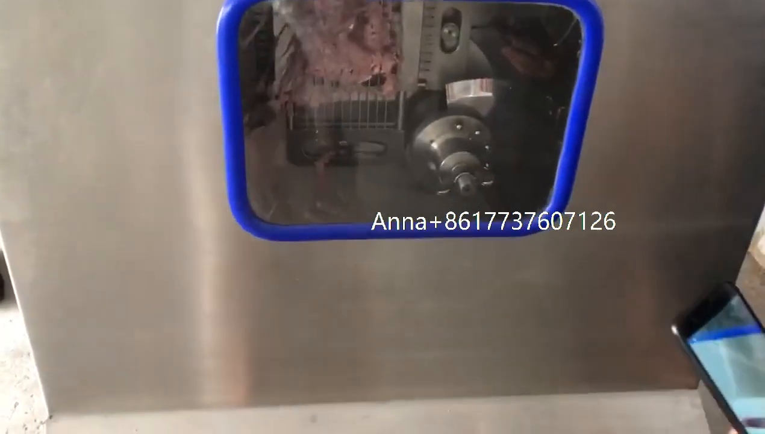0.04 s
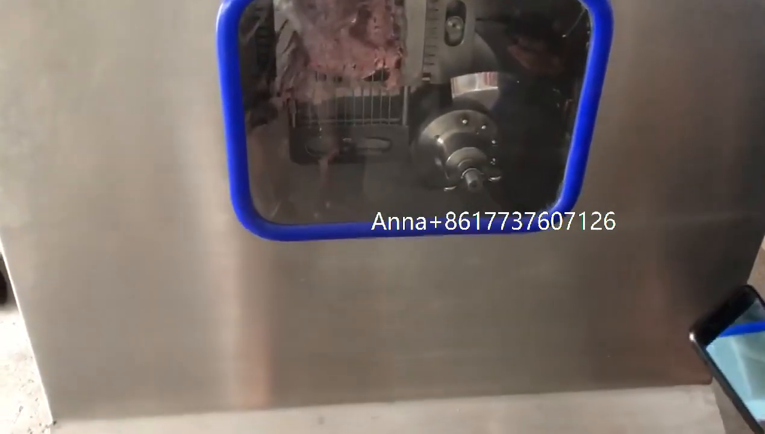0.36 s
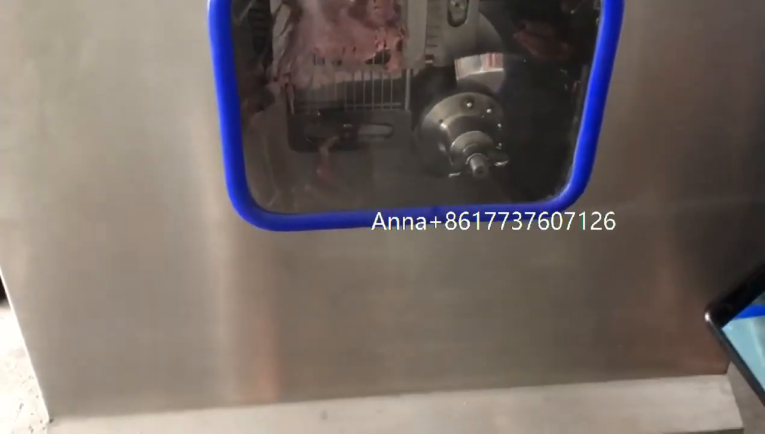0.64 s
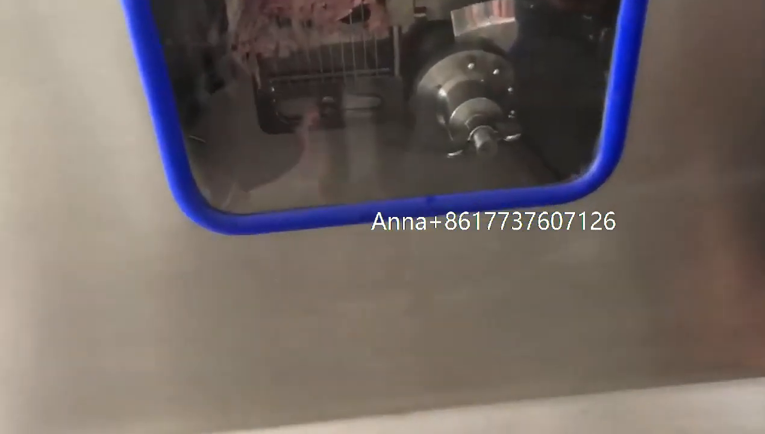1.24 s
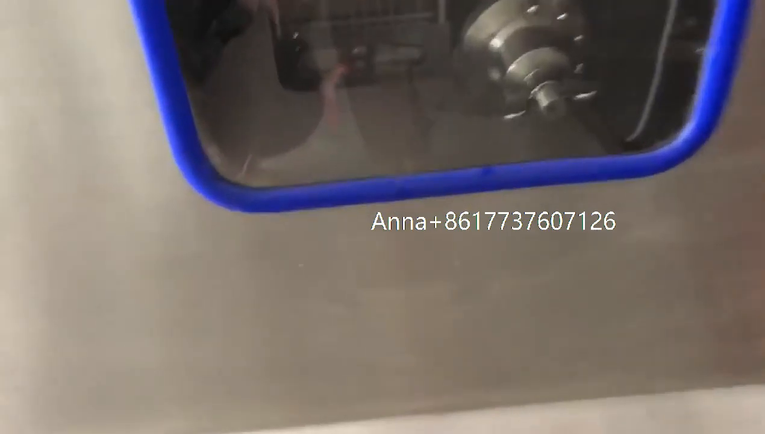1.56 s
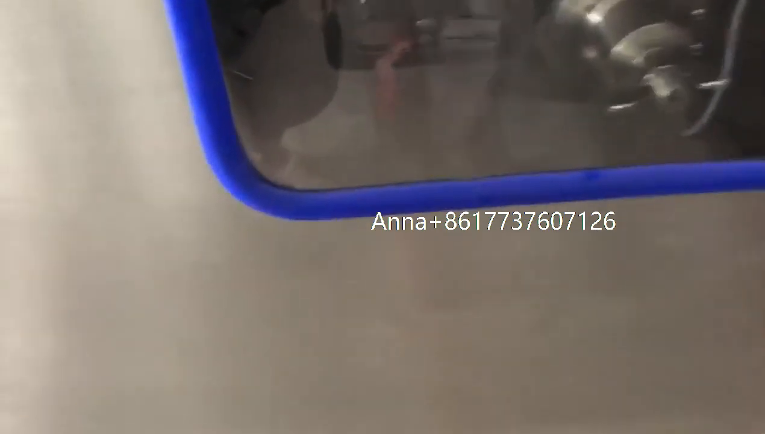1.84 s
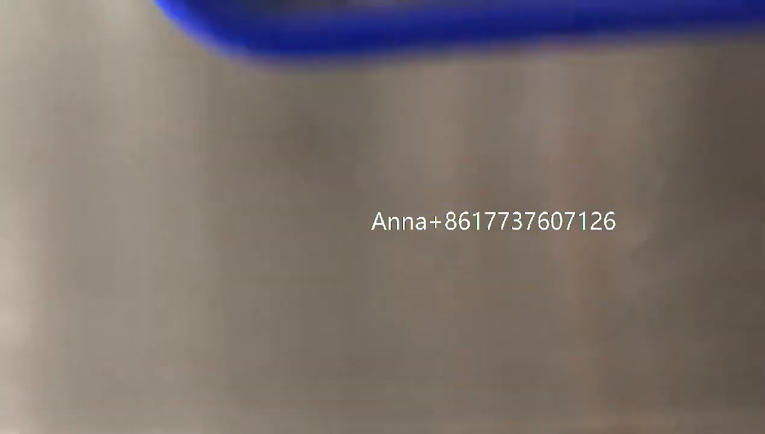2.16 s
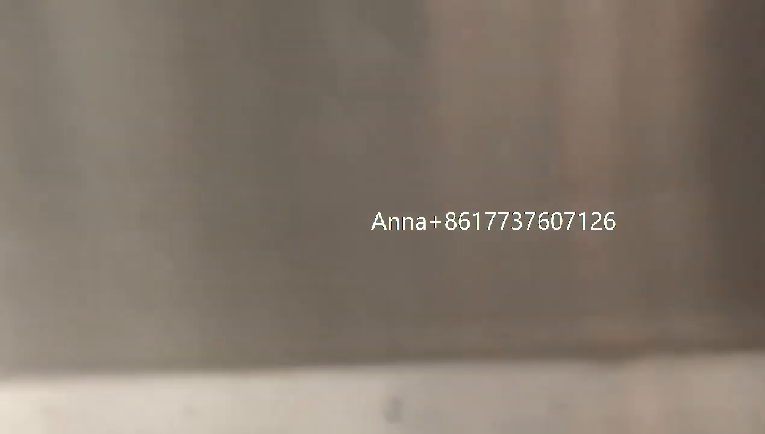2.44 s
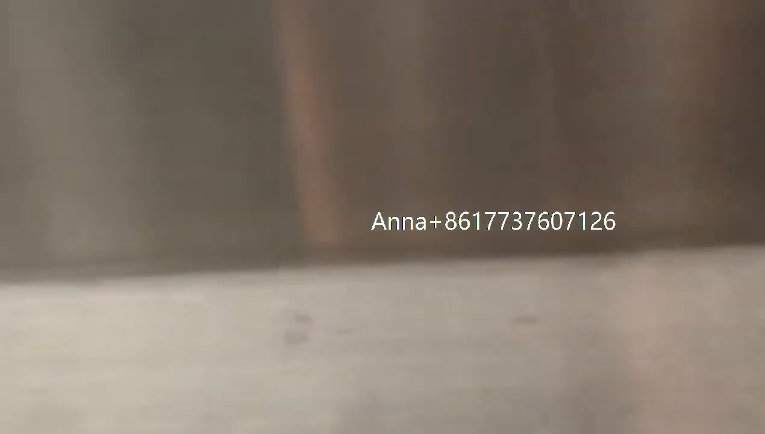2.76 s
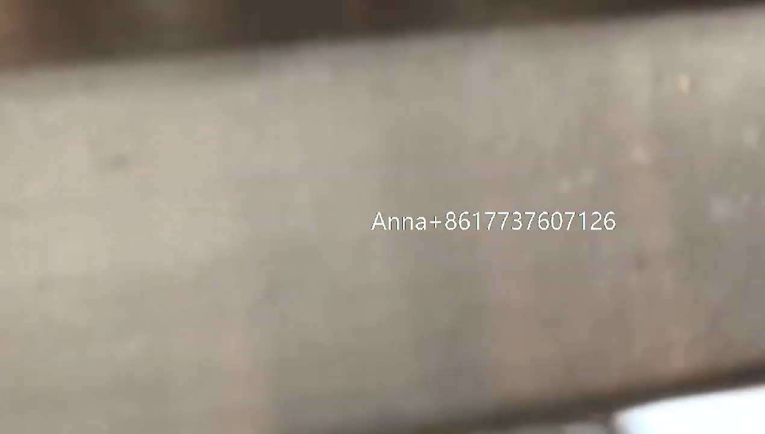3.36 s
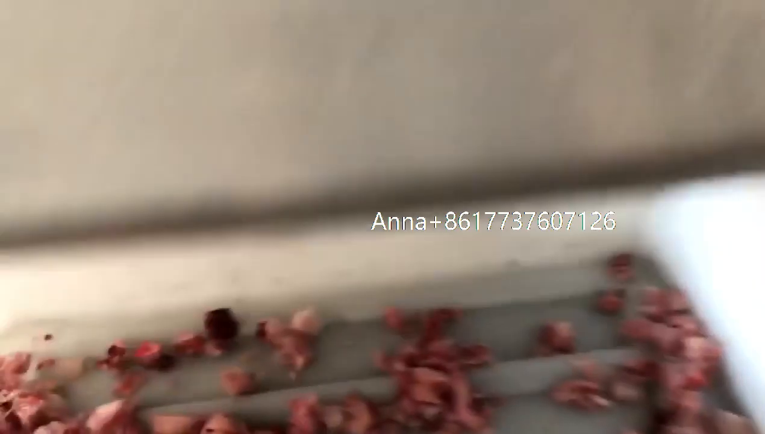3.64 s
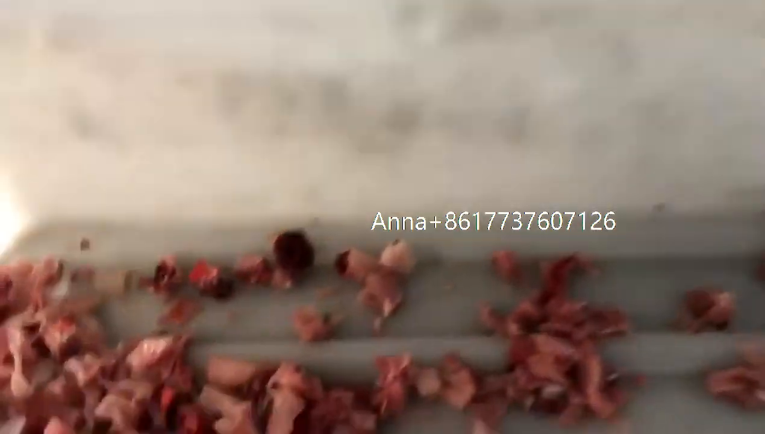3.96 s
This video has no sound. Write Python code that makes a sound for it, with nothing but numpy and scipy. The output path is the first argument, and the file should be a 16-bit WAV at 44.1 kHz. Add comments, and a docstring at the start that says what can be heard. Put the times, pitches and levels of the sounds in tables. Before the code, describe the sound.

Steady motor hum and gear whine from a dicer, ending with wet chunks slapping onto metal.

```python
"""A steady machine hum with a gear whine: a meat dicer running in its steel cabinet, heard from a
microphone that moves along it towards the outlet. The gear teeth hum and whine, the shaft rubs once
a turn, the motor buzzes; ticks, thuds, a hollow knock and two tiny squeaks come from inside.
Near the end wet cubes of meat patter, slap and pop onto a ringing steel tray."""
import sys
import numpy as np
from scipy import signal
from scipy.fft import rfft, irfft
from scipy.io import wavfile
from scipy.ndimage import map_coordinates

SR = 44100
rng = np.random.default_rng(int(sys.argv[2]) if len(sys.argv) > 2 else 0)


def waveform_to_disk(signal):
    """Save audio, clipped to [-1, 1], as 16-bit WAV at the path in sys.argv[1]."""
    frames = np.transpose(np.atleast_2d(signal))
    scaled = np.clip(frames, -1, 1) * 32767
    samples = np.round(scaled).astype(np.int16)
    wavfile.write(sys.argv[1], SR, samples)


N = 176400
T = np.arange(N) / SR
SHAFT_HZ = 24.658

# spectrum of loose cubes landing: f/Hz, density/dB
CUBE_SPECTRUM = [(59, -28), (100, -1), (161, -18), (305, 1), (452, -6.5), (877, -1), (1030, -7),
                 (1560, -0.5), (2270, -8.5), (4680, -14), (9260, -19), (11200, -21.5), (14000, -27)]


def undb(db):
    """Decibels to gain."""
    return 10 ** (np.asarray(db) / 20)


def unit(x):
    """Scale to rms 1."""
    return x / np.sqrt(np.mean(x ** 2) + 1e-20)


def fader(table, column=1):
    """Gain over time from one dB column of a table."""
    rows = np.array(table)
    return undb(np.interp(T, rows[:, 0], rows[:, column]))


def gain_at(hz, spectrum):
    """Gain of a spectrum at hz, falling 12 dB/octave past its ends."""
    f, db = np.array(spectrum).T
    hz = np.maximum(hz, 1)
    skirts = np.minimum(1, np.minimum(hz / f[0], f[-1] / hz)) ** 2
    return undb(np.interp(np.log(hz), np.log(f), db)) * skirts


def noise(spectrum):
    """Noise of rms 1 with the given spectrum."""
    gain = gain_at(np.fft.rfftfreq(N, 1 / SR), spectrum)
    return unit(irfft(rfft(rng.standard_normal(N)) * gain, N))


def band(hz, width_hz):
    """Noise of rms 1 in one resonance."""
    f = np.fft.rfftfreq(N, 1 / SR) + 1
    detuning = (f * f - hz * hz) / (f * width_hz)
    return unit(irfft(rfft(rng.standard_normal(N)) / (1 + .5j * detuning) ** 2, N))


def walk(rate_hz, size=16384):
    """Smooth random drift of rms 1, bandwidth about rate_hz."""
    step_s = N / SR / size
    lowpass = np.exp(-(np.fft.rfftfreq(size, step_s) / rate_hz) ** 2)
    slow = irfft(rfft(rng.standard_normal(size)) * lowpass)
    return np.interp(T, step_s * np.arange(size), unit(slow))


def blow(start_s, attack_s, decay_s):
    """Impact envelope: linear rise, exponential fall."""
    age_s = T - start_s
    return np.clip(age_s / attack_s, 0, 1) * np.exp(-np.clip((age_s - attack_s) / decay_s, 0, 20))


def ring(x, response):
    """Convolve with a response scaled to unit energy."""
    return signal.fftconvolve(x, response / np.linalg.norm(response))[:N]


def steel(x, modes, t60_s):
    """Sheet steel struck by x, as loud as x; t60_s holds at 1 kHz, higher modes die sooner."""
    response = sum(undb(db - 60 * T / t60_s * (hz / 1000) ** 0.91) * np.cos(2 * np.pi * hz * T)
                   for hz, db in modes)
    return unit(ring(x, response)) * np.std(x)


def gear(angle, teeth=13):
    """Meshing teeth: a hum, a whine and weak overtones that throb or swing in phase once a turn."""
    # tooth tone at the moving microphone: t/s, level/dB
    hum_level = [(0.0, -26), (0.02, -27.5), (1.32, -30), (2.42, -37.5), (2.64, -34), (3.21, -34.5),
                 (3.24, -36.5), (3.7, -36.5), (3.82, -53), (3.85, -30.5), (3.9, -64), (3.92, -42),
                 (3.95, -61), (4.0, -31)]
    # whine partials: multiple of the shaft speed
    whine_orders = (26, 36, 52, 78, 156)
    # once-a-turn throb of each partial: depth/1
    whine_throbs = (.15, .05, .25, .3, .55)
    # whine: t/s, then level/dB of each partial
    whine_levels = [(0.0,-48,-53,-59,-54.5,-67),(0.41,-47,-50.5,-60,-59.5,-77),(0.63,-46,-66,-58,-64,-64),(0.93,-46,-50,-56.5,-58,-67),(1.1,-48,-45.5,-60.5,-62,-59),(1.51,-55,-41.5,-49,-58.5,-59.5),(1.75,-49,-48.5,-52.5,-52,-58.5),(1.93,-48,-68,-54,-50,-57),(2.09,-48,-60,-56,-54.5,-56),(2.24,-43.5,-50,-54,-59,-62),(2.36,-44.5,-71,-50,-50,-60),(2.55,-47.5,-71,-48.5,-47.5,-64),(2.68,-50,-67,-55,-59,-56),(2.9,-64,-56,-48.5,-49,-55.5),(3.13,-51.5,-54,-47.5,-58,-55),(3.3,-48,-48,-45,-67,-58),(3.5,-50,-55,-45.5,-55,-62)]
    # overtones: multiple of the tooth tone, level/dB
    overtones = [(5,-60.5),(7,-60.5),(8,-64),(9,-69),(10,-63),(15,-70)]
    out = fader(hum_level) * np.sin(teeth * angle) * (1 + 0.017 * np.sin(angle) + 0.1 * walk(26))
    uneven_angle = angle + (0.07 * np.sin(angle) + .035 * walk(29)) / teeth
    for i, order in enumerate(whine_orders):
        phase, lag = rng.uniform(0, 2 * np.pi, 2)
        throb = 1 + whine_throbs[i] * np.sin(angle + lag)
        out += fader(whine_levels, column=i + 1) * throb * np.sin(order * uneven_angle + phase)
    for multiple, db in overtones:
        phase, lag = rng.uniform(0, 2 * np.pi, 2)
        gain = undb(db + 2 * walk(3.2)) * (1 + .38 * walk(50))
        mesh_rad = teeth * angle + .06 * walk(23)
        swing_rad = .9 * np.sin(angle + lag)
        out += gain * np.sin(multiple * mesh_rad + phase + swing_rad)
    return np.sqrt(2) * out


def shaft_rub(angle, sweep_hz_per_s=15180):
    """A short rising sweep once a turn; its colour shifts as the microphone passes the window."""
    # rub partials: f/Hz (snapped to shaft harmonics), level at the window/dB, level past it/dB
    partials = [(617.2,-58,-57),(654,-50,-50.5),(714,-55,-56),(721,-60.5,-59),(741,-59,-54),(765,-64,-54.5),(790,-57,-51),(812.3,-61,-49.5),(839.5,-64,-61),(867.5,-54.5,-55.5),(912,-58,-49.5),(938.7,-57.5,-55.5),(968.6,-63,-53),(984,-70,-68),(1039,-75,-58.5)]
    lowest_hz = partials[0][0]
    passed = np.interp(T, (0.96, 2.56), (0, 1))
    out = np.zeros(N)
    for hz, window_db, past_db in partials:
        lag = np.pi * (hz - lowest_hz) ** 2 / sweep_hz_per_s + 0.53 * rng.standard_normal()
        db = window_db + (past_db - window_db) * passed + 1.5 * walk(2.1)
        out += undb(db) * np.sin(np.round(hz / SHAFT_HZ) * angle - lag + 0.47 * walk(0.35))
    return np.sqrt(2) * out * undb(-0.5)


def drive_buzz(angle, size=4096):
    """Roughness of the drive that repeats every turn and slowly changes colour."""
    # envelope of the shaft harmonics: f/Hz, relative level/dB
    spectrum = [(170,-9),(260,-37),(370,16.5),(430,-3),(520,2.5),(620,6),(700,0),(1100,2),(1300,-9.5),(1600,-8),(2300,-14),(2700,-7),(3300,-10),(5000,-22),(6500,-19)]
    harmonic_gains = gain_at(np.arange(size // 2 + 1) * SHAFT_HZ, spectrum)
    position = angle / (2 * np.pi) * size % size
    out = np.zeros(N)
    for crossfade in (np.cos(T), np.sin(T)):
        one_turn = irfft(rfft(rng.standard_normal(size)) * harmonic_gains)
        out += crossfade * map_coordinates(one_turn, [position], order=1, mode="grid-wrap")
    return unit(out) * undb(-51.5)


def mains_hum(hz=100):
    """The motor's mains hum, its phase drifting slightly."""
    # hum at the moving microphone: t/s, level/dB
    level = [(0.0, -46.5), (0.3, -50), (0.46, -66), (0.61, -46), (1.0, -49.5), (1.12, -63), (1.35, -46.5),
             (1.66, -48), (1.76, -62), (2.22, -43), (2.67, -50.5), (3.09, -40), (3.19, -46.5),
             (3.88, -42.5), (3.97, -29), (4.0, -43)]
    return np.sqrt(2) * fader(level) * np.sin(2 * np.pi * hz * T + 0.089 * walk(1.8))


def rush(flicker_db=.6):
    """Broad noise of the running machine in three flickering bands."""
    # band spectra: f/Hz, density/dB
    bass = [(25,-30),(50,-10),(80,-2.5),(120,-3),(170,1.5),(220,-3.5),(270,-4),(400,-9.5),(480,-3.5),(600,-4),(800,-14)]
    mid = [(400,-13),(550,-7.5),(750,0),(1000,1.5),(1500,-5.5),(2000,-8),(2700,-14),(3400,-10),(5000,-12.5),(6300,-12.5),(8000,-17.5),(10000,-28)]
    treble = [(6000,-32),(8000,-6.5),(9500,-2.5),(10800,-3.5),(12000,-4.5),(13000,-16),(14300,-13.5)]
    # band levels: t/s, level/dB
    bass_level = [(0,-45),(.3,-46),(.7,-48),(1.099,-51),(1.4,-44),(2.0,-53.5),(2.6,-51),(3.1,-50),(3.25,-46),(3.6,-44)]
    mid_level = [(0,-47),(.9,-51),(1.4,-47.5),(2.3,-47.5),(3.1,-46.5),(3.5,-44.5)]
    treble_level = [(0,-57.5),(0.751,-57),(1.0,-65),(1.5,-60),(2.25,-56.5),(2.7,-62.5),(3.3,-58.5)]
    return sum(noise(spectrum) * fader(level) * undb(flicker_db * walk(33))
               for spectrum, level in ((bass, bass_level), (mid, mid_level), (treble, treble_level)))


def swells():
    """Low drones, a soft rustle, a faint ring and a thin sizzle that swell and fade."""
    # noise bands: f/Hz, width/Hz, peak level/dB, peak t/s, 1/e half-length/s
    drones = [(217.4,5.8,-48,1.83,0.56),(175,23,-52,2.3,0.96),(1490,680,-48,1.426,0.095),(2900,40,-58,2.3,.08),(10750,300,-61.5,0.65,.32)]
    return sum(undb(db) * np.exp(-((T - peak_s) / half_s) ** 2) * band(hz, width_hz)
               for hz, width_hz, db, peak_s, half_s in drones)


def ticks(top_hz=7000):
    """Ticks inside the cabinet ring its steel panels."""
    # noise bursts: t/s, level/dB, f/Hz, width/Hz, decay/s
    bursts = [(0.2622,-35.5,1870,1760,0.0035),(0.269,-42.5,1300,1490,0.019),(2.165,-30.5,2600,2200,0.0041),(3.186,-30,3000,4930,0.0016),(3.198,-34,2480,6000,0.0032),(3.26,-38,1670,1510,0.0048),(3.267,-35,1860,2010,0.0076)]
    # panel modes: f/Hz, relative level/dB
    panel_modes = [(1180,9),(1450,9),(1590,-4.5),(1840,-2),(1990,1.5),(2510,7.5),(2860,9),(3410,-40),(3800,-12),(4500,-3),(6190,6)]
    out = sum(undb(db) * blow(at_s, 0.0014, decay_s) * band(hz, width_hz)
              for at_s, db, hz, width_hz, decay_s in bursts)
    out = signal.sosfilt(signal.butter(2, top_hz, fs=SR, output="sos"), out)
    return out + undb(2) * steel(out, panel_modes, t60_s=0.1)


def thuds(wobble=.12):
    """Dull bumps: low damped tones of wandering pitch."""
    # bumps: t/s, level/dB, f/Hz, decay/s
    bumps = [(0.265,-34,235,0.02),(2.14,-37,300,0.031),(3.188,-41,75,0.06),(3.613,-35,90,0.033),(3.70,-48,220,0.023),(3.735,-37,70.6,0.026),(3.813,-33,115,0.04),(3.954,-25.5,72,0.03),(3.983,-30,140,.03)]
    clock_s = np.cumsum(1 + wobble * walk(60.2)) / SR
    return sum(np.sqrt(2) * undb(db) * blow(at_s, 0.0043, decay_s) * np.sin(2 * np.pi * hz * clock_s)
               for at_s, db, hz, decay_s in bumps)


def knock(at_s=2.1357, hz=840):
    """One hollow knock: a heavily damped tone."""
    return undb(-16.5) * blow(at_s, 0.0003, 0.0019) * np.sin(2 * np.pi * hz * (T - at_s))


def squeaks(hz=4370, wobble=.008):
    """Two tiny squeaks of one wavering high tone."""
    # squeaks: t/s, length/s, level/dB
    events = [(2.59,0.029,-47.5),(3.429,0.037,-41.5)]
    pitch_hz = hz * (1 + wobble * walk(170))
    tone = np.sqrt(2) * np.sin(2 * np.pi * np.cumsum(pitch_hz) / SR)
    return tone * sum(undb(db) * np.sin(np.pi * np.clip((T - at_s) / length_s, 0, 1))
                      for at_s, length_s, db in events)


def cube_taps(rate_hz=450, low_hz=400, high_hz=6000, decay_s=.004, size=1024):
    """A shower of single cubes, each a damped tap at its own pitch; rms 1."""
    out, age_s = np.zeros(N + size), np.arange(size) / SR
    for when, pitch, force in rng.random((int(rate_hz * N / SR), 3)):
        at = int(when * N)
        hz = low_hz * (high_hz / low_hz) ** pitch
        gain = gain_at(hz, CUBE_SPECTRUM) * np.sqrt(hz) * undb(6 * force)
        out[at:at + size] += gain * np.exp(-age_s / decay_s) * np.sin(2 * np.pi * hz * age_s)
    return unit(out[:N])


def patter():
    """Loose cubes landing: separate taps in a grainy wash."""
    # patter: t/s, level/dB
    level = [(3.1,-78),(3.38,-51),(3.48,-42),(3.55,-33.5),(3.63,-33),(3.71,-24.5),(3.755,-31.5),(3.81,-26.5),(3.875,-31),(3.92,-28),(3.95,-30.5),(4.0,-25)]
    wash = noise(CUBE_SPECTRUM) * unit(np.exp(0.24 * walk(390)))
    return fader(level) * (undb(-0.5) * wash + undb(-2.5) * cube_taps())


def slaps():
    """Wet clumps land with a dull slap and a grainy squelch."""
    # landings: t/s, level/dB, decay/s, brightness/dB
    clumps = [(3.539,-28.5,0.0058,4.5),(3.605,-27.5,0.011,1),(3.636,-30,0.01,0),(3.6673,-20.5,0.003,10),(3.689,-30,0.013,7.5),(3.697,-27,0.0098,6),(3.769,-24,0.0049,2),(3.778,-21,0.0055,11.5),(3.797,-29,0.018,9.5),(3.823,-24,0.0042,13),(3.833,-26,0.0081,11),(3.858,-27,.004,4),(3.898,-21,0.0072,6),(3.972,-25,0.0069,11.5),(3.977,-19.5,0.0045,2.5)]
    # slap and squelch spectra: f/Hz, density/dB
    body_spectrum = [(150,-17),(400,-2.5),(750,-3),(1100,-1),(1550,-9.5),(2000,-10),(2600,-7.5),(4000,-16)]
    squelch_spectrum = [(1200,-15),(2400,-9),(3600,-1),(5000,0),(6300,-1.5),(8000,-0.5),(10000,-3.5),(14000,-6.5)]
    body = noise(body_spectrum)
    squelch = undb(-7.5) * noise(squelch_spectrum) * unit(np.exp(0.19 * walk(900)))
    return sum(undb(db) * blow(at_s, 0.0022, decay_s) * (body + undb(bright_db) * squelch)
               for at_s, db, decay_s, bright_db in clumps)


def pops(wobble=0.0253):
    """The wet clumps also give a short pitched pop as they land."""
    # wet pops: t/s, f/Hz, level/dB, decay/s
    pieces = [(3.607,2480,-29,.008),(3.659,1400,-24,0.005),(3.669,4460,-17,0.0016),(3.669,1640,-23,.008),(3.671,770,-21,0.016),(3.674,3550,-24,.003),(3.689,1560,-20,0.0029),(3.698,1740,-20,.014),(3.701,2460,-17,0.0035),(3.7,1510,-26,0.007),(3.732,4500,-29,0.0017),(3.735,1480,-26.5,.009),(3.77,1650,-28,0.0045),(3.782,3850,-22,0.0023),(3.784,1200,-21,0.0029),(3.797,1750,-28,0.0023),(3.803,830,-27,0.0042),(3.814,400,-20.5,0.0027),(3.834,3500,-21.5,0.0026),(3.859,1300,-32,.005),(3.899,4950,-23,.004),(3.901,2100,-24,.006),(3.91,830,-30,0.0074),(3.977,3600,-20,0.0051),(3.980,1230,-15.5,0.0035)]
    clock_s = np.cumsum(1 + wobble * walk(298)) / SR
    return sum(np.sqrt(2) * undb(db) * blow(at_s, 0.0013, decay_s) * np.sin(2 * np.pi * hz * clock_s)
               for at_s, hz, db, decay_s in pieces)


def tray_ring(meat):
    """The steel tray rings under the landing meat."""
    # tray modes: f/Hz, relative level/dB
    low_modes = [(463.0,-39),(732.1,-38),(839.8,-37),(1206,-46),(1281,-50),(1384,-46),(1490,-40),(1561,-37),(1637,-44),(1739,-43),(2010,-32.5),(2170,-41),(2480,-46)]
    high_modes = [(3650,-29.5),(4720,-45),(5120,-35),(7150,-45),(8000,-54),(10900,-54),(12150,-62)]
    return undb(-11) * steel(meat, low_modes + high_modes, t60_s=0.21)


def workshop_echo(x, t60_s=0.17, delay_s=.004):
    """Short, bright reverberation of the room."""
    colour = [(60, -19), (2500, -5), (14000, 3.0)]  # f/Hz, density/dB
    response = noise(colour) * undb(-60 * T / t60_s) * (T > delay_s)
    return undb(-10.5) * ring(x, response)


def scene():
    """The running drive, with cabinet noises and falling meat echoing briefly in the workshop."""
    speed_hz = SHAFT_HZ * (1 + 0.0004 * walk(2.2))
    angle = 2 * np.pi * np.cumsum(speed_hz) / SR
    cabinet = ticks() + thuds() + knock() + squeaks()
    meat = slaps() + patter() + pops()
    hits = cabinet + meat + tray_ring(meat)
    echo = workshop_echo(hits)
    drive = gear(angle) + shaft_rub(angle) + drive_buzz(angle) + mains_hum() + rush() + swells()
    return (drive + hits + echo)[None]


def record(dry, low_cut_hz=34, ceiling=.55, top_hz=14150):
    """Low cut, soft peak limiting, steep top cut."""
    thin = signal.sosfilt(signal.butter(2, low_cut_hz, "high", fs=SR, output="sos"), dry)
    rounded = thin / (1 + (thin / ceiling) ** 4) ** (1 / 4)
    return signal.sosfilt(signal.ellip(10, .2, 80, top_hz, fs=SR, output="sos"), rounded)


dry = scene()
out = record(dry)
waveform_to_disk(out)
```